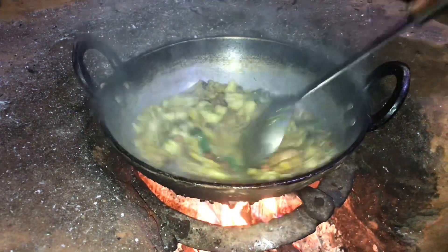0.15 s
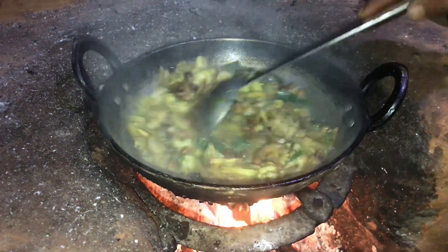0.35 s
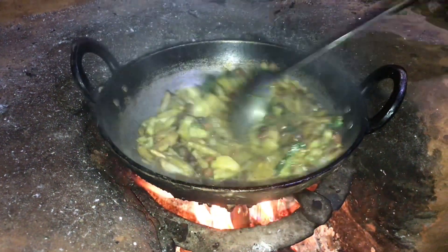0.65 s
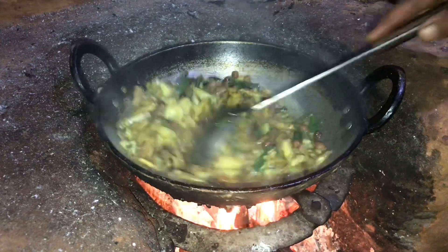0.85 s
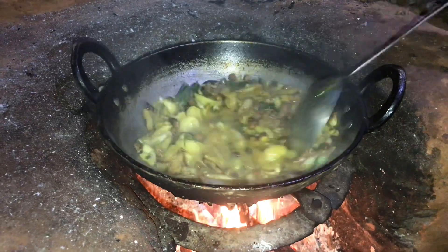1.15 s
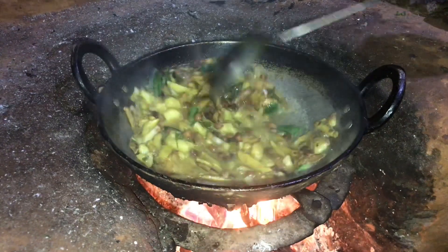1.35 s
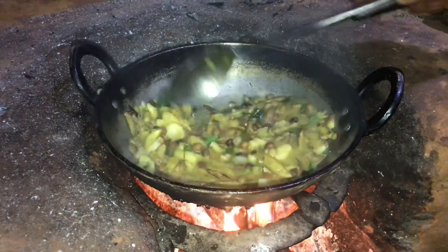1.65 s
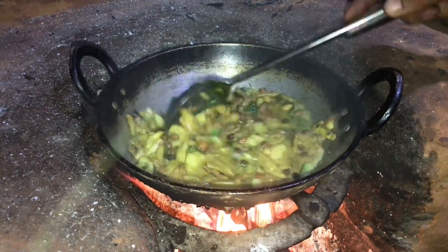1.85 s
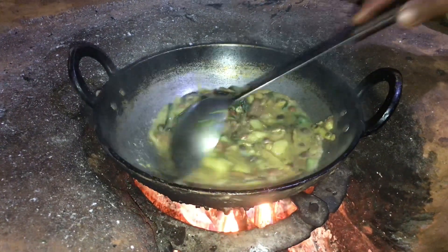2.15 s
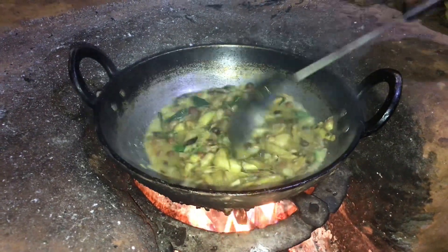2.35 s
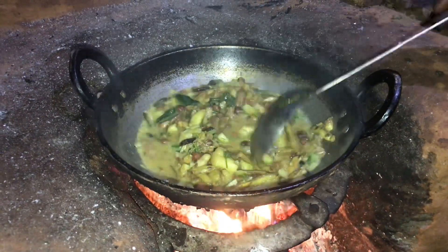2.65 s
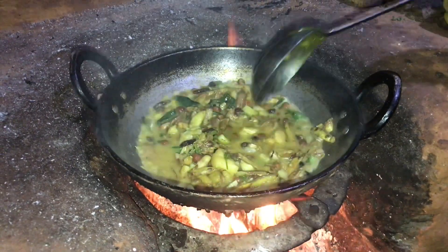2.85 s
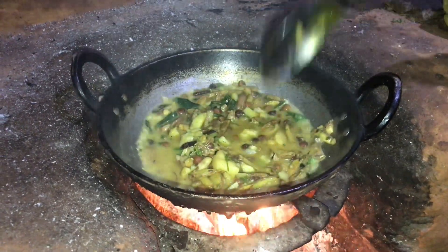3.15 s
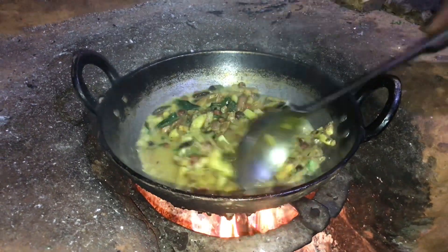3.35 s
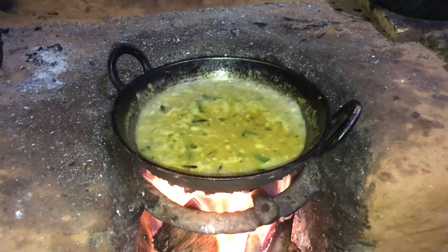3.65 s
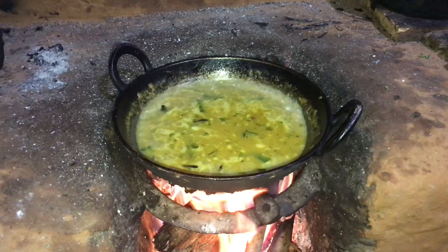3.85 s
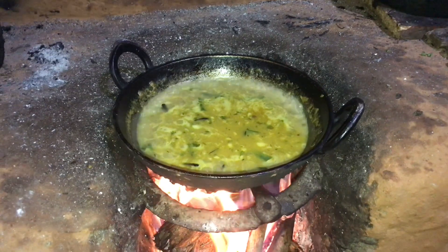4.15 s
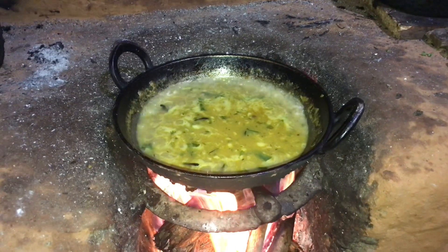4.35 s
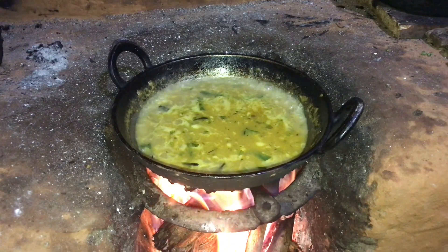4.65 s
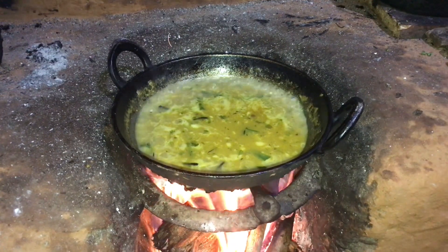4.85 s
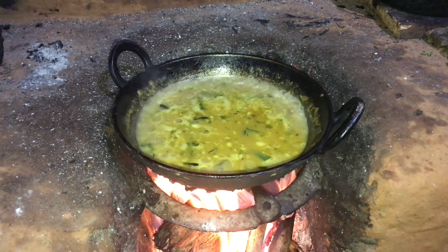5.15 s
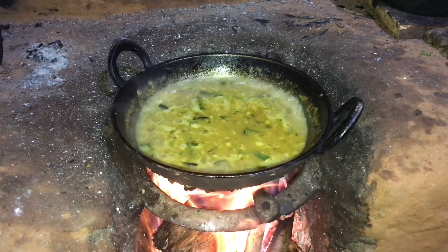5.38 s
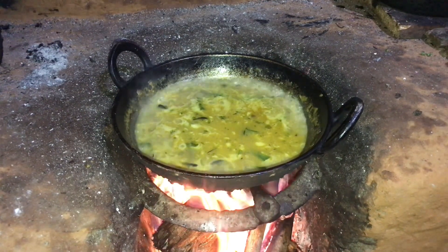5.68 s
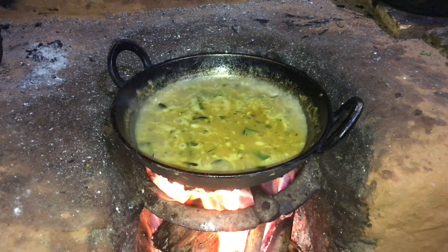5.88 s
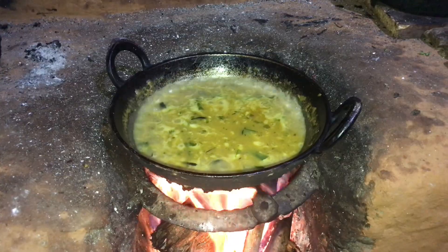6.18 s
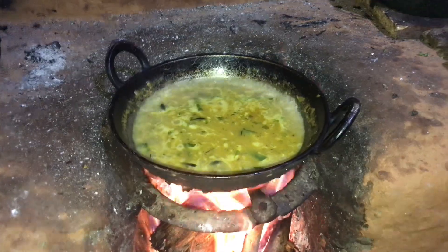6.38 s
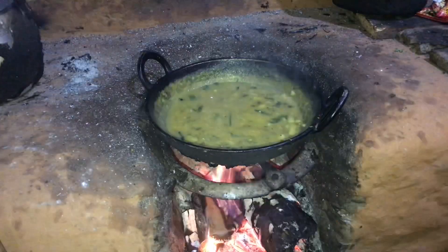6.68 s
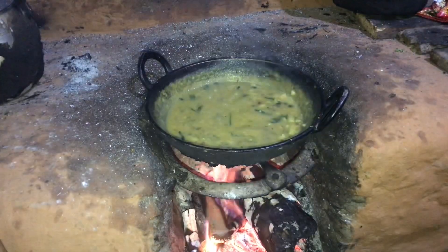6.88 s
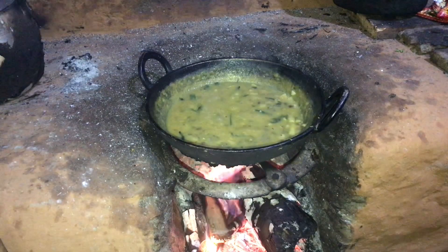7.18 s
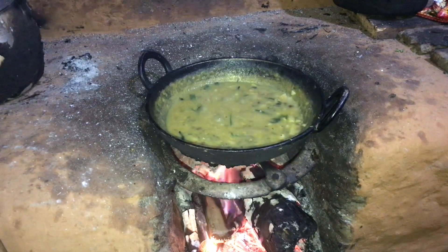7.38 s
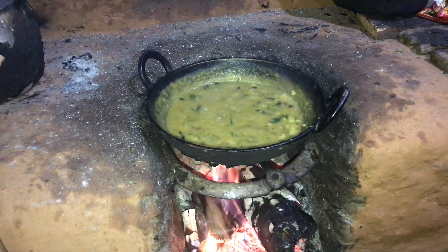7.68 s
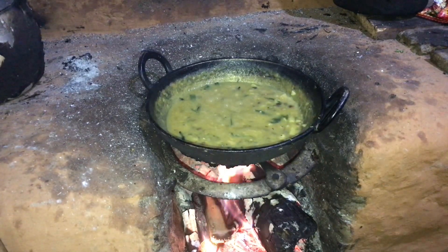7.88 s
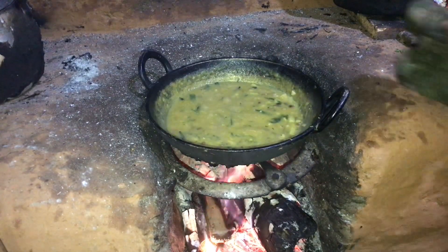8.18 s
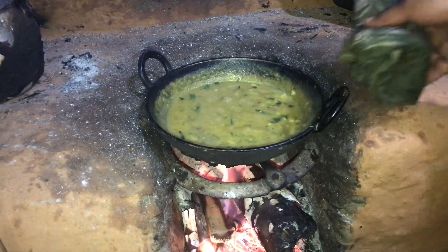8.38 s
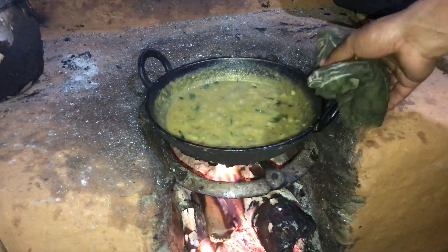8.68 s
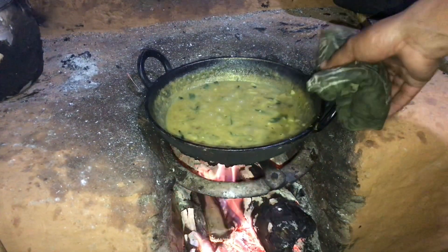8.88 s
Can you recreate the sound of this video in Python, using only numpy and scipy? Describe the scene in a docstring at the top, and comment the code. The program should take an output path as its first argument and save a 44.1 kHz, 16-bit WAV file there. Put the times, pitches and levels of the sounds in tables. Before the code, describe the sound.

Close up over an iron pan on a wood fire, wet vegetables fry with a loud, dense, bright sizzle while a metal ladle rubs the pan and steam squirts. After a tiny gap it drops to a much quieter gravy simmer with fine spatter, soft flame thumps and ticks. Another gap, then very faint bubbling, small plops, crackles of wood and light knocks. Small kitchen, dry, centred sound.

```python
"""Frying pan on a wood fire, heard close up

Vegetables fry loudly in an iron pan while a ladle stirs them; then gravy simmers at the hot rim, then
it has almost settled. The sound drops out briefly between these three stages. Swarms of ringing clicks
and noise make the bubbling; low noise makes the flames, and struck or swept resonances make the ladle,
steam, thick plops, spatter, thumps, ticks and knocks. Both channels carry the same signal.
"""
import sys
import numpy as np
from scipy import signal
from scipy.fft import rfft, irfft, next_fast_len
from scipy.io import wavfile
from scipy.ndimage import uniform_filter1d

SR = 44100
rng = np.random.default_rng(int(sys.argv[2]) if len(sys.argv) > 2 else 0)


def bounce(signal):
    """Save signal as a 16-bit WAV file at the path given by the first command-line argument."""
    frames = np.transpose(np.atleast_2d(signal))
    limited = np.clip(frames, -1, 1)
    pcm = np.round(limited * 32767).astype(np.int16)
    wavfile.write(sys.argv[1], SR, pcm)


N = 398223
TIME = np.arange(N) / SR
GRAVY_AT, SETTLED_AT = 3.52, 6.57  # starts of the simmering and the settling stage, s


def amp(db):
    """Amplitude factor of a level in dB."""
    return 10 ** (np.asarray(db) / 20)


def evened(x):
    """Scales x to an RMS of 1."""
    return x / np.sqrt(np.mean(x ** 2) + 1e-20)


def since(s):
    """Seconds gone by since s; zero before."""
    return np.maximum(TIME - s, 0)


def surge(t, rise_s):
    """Rises to 1 in rise_s, then dies away more slowly."""
    return t / rise_s * np.exp(1 - t / rise_s)


def add(mix, s, sound):
    """Lays a sound into the mix at s seconds, cut off at the end of the mix."""
    part = mix[round(s * SR):][:len(sound)]
    part += sound[:len(part)]


def shaped(x, gain):
    """Filters x by a gain that is a function of frequency."""
    size = next_fast_len(len(x) + 2048)
    return irfft(rfft(x, size) * gain(np.fft.rfftfreq(size, 1 / SR)), size)[:len(x)]


def coloured(x, tone):
    """Weights the spectrum of x by (Hz, dB) points, joined on a log frequency axis."""
    f, db = np.transpose(tone)
    return shaped(x, lambda hz: amp(np.interp(np.log(hz + 1), np.log(f), db)))


def ring(x, hz, width_hz):
    """One resonance of gain 1 at its centre."""
    return signal.lfilter(*signal.iirpeak(min(hz, .45 * SR), hz / min(width_hz, SR / 4), SR), x)


def flutter(size, rate_hz):
    """Slow random wavering of unit spread."""
    return evened(shaped(rng.standard_normal(size), lambda hz: 1 / (1 + (hz / rate_hz) ** 2)))


def bursts(size, per_s, spread_db, sharpness, count=20):
    """A swarm of bursting bubbles, evenly loud over all pitches: random clicks of random size ring briefly."""
    swarm = np.zeros(size)
    for hz in np.linspace(.02, .36, count) * SR:
        pops = rng.choice([-1., 1.], size) * amp(spread_db * np.minimum(rng.exponential(1, size), 3.2))
        pops *= rng.random(size) < per_s / count / SR
        swarm += evened(ring(pops, hz, 900 + hz / sharpness))
    return evened(swarm)


def patchy(x, depth_db):
    """Bubbles come in clumps of like size: patches about 1 kHz wide that last some 25 ms."""
    z = signal.stft(x, nperseg=256, noverlap=192)[2]
    patches = uniform_filter1d(rng.standard_normal(z.shape), size=6, axis=0)
    patches = uniform_filter1d(patches, size=17, axis=1)
    return signal.istft(z * amp(depth_db * evened(patches)), nperseg=256, noverlap=192)[1][:len(x)]


def sizzle(span, levels, tone, per_s, spread_db, juice_share, spray_share, flutter_db, clump_db):
    """Near bubbles stand out of the hiss of countless small ones; juice sounds low, spray high and in spurts."""
    part = slice(round(span[0] * SR), round(span[1] * SR))
    juice_db, spray_db = np.array(levels)[:, part]
    size = len(TIME[part])
    near = bursts(size, per_s, spread_db, sharpness=2.9)
    hiss = rng.standard_normal(size)

    def low(hz):
        return 1 / (1 + (hz / 4500) ** 6)

    def blend(near_share):  # share of the power
        return coloured(np.sqrt(near_share) * near + np.sqrt(1 - near_share) * hiss, tone)

    juice = evened(shaped(blend(juice_share), low))
    spray = evened(shaped(blend(spray_share), lambda hz: 1 - low(hz)))
    spurt_db = flutter_db * flutter(size, rate_hz=24)
    sound = juice * amp(juice_db + .5 * spurt_db) + spray * amp(spray_db + spurt_db)
    return patchy(sound, clump_db)


# Flares of the sizzle as wet food or gravy touches hot iron; a negative rise is a slight dip.
# Each row: start in seconds, rise of the spray in dB.
FLARE_ROWS = [(0.0, 1.5), (.12, 1.5), (.3, 3), (.37, -0.5), (.49, 1), (.61, 1.8), (.725, 3.5), (.95, 2),
              (1.12, 1.5), (1.32, 2.5), (1.72, 1.5), (2.44, -0.1), (2.74, 0.8), (5.11, 5.5), (5.4, 2),
              (5.78, 0.5)]
FLARE_RISE_S, FLARE_JUICE_SHARE = 0.022, 0.32  # the juice rises by this share of the spray's dB


def flares():
    """Rise of the sizzle (dB): every flare has the same quick swell and slower fall."""
    return sum(db * surge(since(s), FLARE_RISE_S) for s, db in FLARE_ROWS)


FRY_JUICE_DB, FRY_SPRAY_DB = -29.5, -23.5  # while the ladle stirs briskly
EASE_AT, EASE_S, EASE_DB = 1.44, 0.099, -1.48  # drop as the stirring eases off


def frying_levels():
    """Juice and spray (dB): wet food on the iron makes them flare, and both ease as the stirring slows."""
    ease = EASE_DB * .5 * (1 + np.tanh((TIME - EASE_AT) / EASE_S))
    flare = flares()
    return FRY_JUICE_DB + ease + FLARE_JUICE_SHARE * flare, FRY_SPRAY_DB + ease + flare


# levels as the simmering starts, and their growth as the gravy heats
SIMMER_JUICE_DB, SIMMER_SPRAY_DB, HEATING_DB_PER_S = -52.5, -55.5, 0.23


def simmer_levels():
    """Bubbling and spray (dB) grow slowly with the heat, and flare where gravy laps the rim."""
    heat = HEATING_DB_PER_S * since(GRAVY_AT)
    flare = flares()
    return SIMMER_JUICE_DB + heat + FLARE_JUICE_SHARE * flare, SIMMER_SPRAY_DB + heat + flare


REST_JUICE_DB, REST_SPRAY_DB = -68, -69.5
CALMING_DB, CALMING_S = 3, 0.16  # extra level that dies away at the start
SWELL_AT, SWELL_S, SWELL_DB = 8.2, 0.26, 6  # gravy wets the rim


def settling_levels(juice_share=0.56):
    """Bubbling and spray (dB) calm down, then swell once at the rim."""
    calming = CALMING_DB * np.exp(-since(SETTLED_AT) / CALMING_S)
    swell = SWELL_DB * np.exp(-((TIME - SWELL_AT) / SWELL_S) ** 2)
    return REST_JUICE_DB + calming + juice_share * swell, REST_SPRAY_DB + calming + swell


# Spectral weighting of the bubbles in the three stages, heard right over the pan.
# Each row: frequency in Hz, relative weight in dB.
FRYING_SPECTRUM = [(110, -49), (180, -24), (347, -21.5), (451, -22), (608, -12.5), (989, -10.5),
                   (1150, -3.5), (1330, -9), (1470, -7), (3100, -1.5), (4860, 0), (9350, 2), (10500, 1),
                   (12400, 1.5), (15800, -1)]
SIMMER_SPECTRUM = [(110, -33), (180, -23), (225, -4), (272, -14.5), (388, -9), (495, -14), (680, -9),
                   (901, -8.5), (1070, -1), (1240, -7.5), (1520, -3), (3100, 0.5), (7760, -11),
                   (12900, -13), (15800, -16)]
SETTLING_SPECTRUM = [(88, -41), (150, -5.5), (244, -5.5), (361, -6.5), (382, -3), (598, -6), (634, -9),
                     (741, -6.5), (1330, -11), (2340, -12), (4910, -6.5), (8640, -3.5), (15800, -10.5)]


def pan():
    """The bubbles grow fewer from stage to stage, so that single ones stand out more."""
    frying = sizzle((0, GRAVY_AT), frying_levels(), FRYING_SPECTRUM, per_s=16000, spread_db=1.0,
                    juice_share=0.27, spray_share=0.27, flutter_db=0.43, clump_db=0.8)
    simmer = sizzle((GRAVY_AT, SETTLED_AT), simmer_levels(), SIMMER_SPECTRUM, per_s=2200, spread_db=4.0,
                    juice_share=0.15, spray_share=0.17, flutter_db=1.2, clump_db=1.0)
    settling = sizzle((SETTLED_AT, N / SR), settling_levels(), SETTLING_SPECTRUM, per_s=260, spread_db=-4.5,
                      juice_share=0.078, spray_share=0.15, flutter_db=-0.5, clump_db=2.5)
    return np.concatenate([frying, simmer, settling])


# Spectral weighting of the fire under the pan. Each row: frequency in Hz, relative weight in dB.
FLAME_SPECTRUM = [(11, -41), (18, -6), (48, -7.5), (86, 2), (123, -3), (183, -17.5), (221, -13.5),
                  (273, -17.5), (300, -10.5), (390, -38), (660, -120)]
FIRE_FRY_DB, FIRE_SIMMER_DB, FIRE_SETTLED_DB = -57, -60, -68  # level of the flames as each stage starts, dB
FIRE_SAG_DB_PER_S = -1.03


def flames(flutter_db=2.0):
    """A low roar in the mouth of the stove: fluttering noise that sinks through each stage."""
    roar = evened(coloured(rng.standard_normal(N), FLAME_SPECTRUM))
    roar = evened(roar * amp(flutter_db * flutter(N, rate_hz=22)))
    stages = [TIME < GRAVY_AT, TIME < SETTLED_AT]
    level_db = np.select(stages, [FIRE_FRY_DB, FIRE_SIMMER_DB], FIRE_SETTLED_DB)
    age = np.select(stages, [TIME, since(GRAVY_AT)], since(SETTLED_AT))
    return roar * amp(level_db + FIRE_SAG_DB_PER_S * age)


# Ladle strokes on the iron. Each row: start in seconds, level in dB before the fades, length in seconds.
STROKE_ROWS = [(.05, -41, 0.098), (0.149, -39.5, .12), (0.269, -43, 0.092), (.499, -38, 0.23),
               (.88, -43.5, 0.18), (1.5, -42, .076), (1.696, -43, .12)]
# Modes of the loaded pan. Each row: frequency in Hz, width in Hz, relative level in dB.
PAN_MODES = [(360, 83, -32), (620, 300, 18), (755, 65, -3), (1270, 96, 25.5), (1590, 39, 14),
             (2130, 160, 9)]


def ladle():
    """The ladle rubs over the iron and sets the damped pan humming: noise through the pan's modes."""
    out = np.zeros(N)
    for s, db, length in STROKE_ROWS:
        rub = rng.standard_normal(SR // 2)[:int(length * SR)]
        hum = sum(amp(mode_db) * ring(rub, hz, width) for hz, width, mode_db in PAN_MODES)
        add(out, s, amp(db) * evened(hum) * signal.windows.hann(len(rub)))
    return out


def puffs(rows, width_share, rise):
    """Brief whistles through a small opening, whose pitch wavers and rises as it closes."""
    out = np.zeros(N)
    for s, db, hz, length in rows:
        u = np.linspace(0, 1, int(length * SR))
        wander = flutter(SR // 4, width_share * hz)[:len(u)]
        turns = np.cumsum(hz * (1 + rise * (u - .5) + width_share * wander)) / SR
        breath = 1 + .5 * flutter(SR // 4, width_share * hz)[:len(u)]
        puff = np.sin(2 * np.pi * turns) * breath * np.sin(np.pi * u ** 1.07)
        add(out, s, amp(db) * puff / abs(puff).max())
    return out


# Steam squirting from under the food.
# Each row: start in seconds, peak in dB, pitch in Hz, length in seconds.
SQUIRT_ROWS = [(.31, -20, 10800, 0.11), (.36, -17, 8260, 0.079), (.74, -19, 10740, 0.087),
               (.745, -15, 8300, 0.028), (2.43, -26, 2910, 0.23), (2.45, -24, 4300, 0.19),
               (3.567, -47, 6800, .011), (5.435, -46, 8500, 0.022), (5.8, -44, 9400, .058),
               (5.91, -48, 9200, .025), (6.515, -40, 6700, 0.011)]


def squirts():
    """Steam whistles out from under the food, each squirt a wavering high tone."""
    return puffs(SQUIRT_ROWS, width_share=0.099, rise=0.0187)


def spatter(span, per_s, least_db, spread_db, count=8):
    """Droplets spit on the hot rim: dry clicks, most of them small and each of its own brightness."""
    out, t = np.zeros(N), np.arange(512) / SR
    within = (TIME > span[0]) & (TIME < span[1])
    for hz in np.geomspace(5500, 13000, count):
        click = rng.choice([-1., 1.], len(t)) * np.exp(-t / 0.0011)
        click = ring(ring(click, hz, 1.2 * hz), hz, 1.2 * hz)
        size = amp(least_db + spread_db * np.minimum(rng.exponential(1, N), 2.5))
        hits = size * within * (rng.random(N) < per_s / count / SR)
        out += signal.oaconvolve(hits, click / abs(click).max())[:N]
    return out


# Soft thumps as the flames puff in the stove. Each row: start in seconds, peak in dB, pitch in Hz.
THUMP_ROWS = [(3.716, -47, 88), (4.492, -50, 104), (4.653, -47, 99), (4.927, -47, 81), (5.856, -53, 81),
              (5.959, -52, 100), (6.07, -54, 78), (6.294, -54, 78), (6.46, -49, 90), (7.035, -52, 84),
              (7.42, -49.5, 114)]


def thumps(rise_s=0.009):
    """Each puff of flame rings the hollow of the stove for a few cycles."""
    out, t = np.zeros(N), np.arange(8192) / SR
    for s, db, hz in THUMP_ROWS:
        add(out, s, amp(db) * surge(t, rise_s) * np.sin(2 * np.pi * hz * t))
    return out


# Sharp ticks of the burning wood. Each row: start in seconds, peak in dB, centre frequency in Hz.
TICK_ROWS = [(3.981, -38, 6000), (4.502, -34, 7000), (5.142, -39, 9000), (5.981, -33.5, 6500),
             (6.372, -32, 8000), (6.688, -44, 6500), (6.747, -46, 6000), (7.033, -44, 4500),
             (7.156, -45, 7000), (7.2355, -49, 8600), (7.3, -46, 12400), (7.386, -43.5, 6300),
             (7.472, -46, 10500), (7.523, -49, 11000), (7.886, -48, 5500), (7.9027, -43, 8900),
             (8.166, -43, 11400), (8.374, -44, 14000), (8.418, -41, 12700), (8.641, -35.5, 8050),
             (8.752, -40, 11000), (8.758, -44, 12500), (8.785, -46, 12000), (8.881, -44, 11500),
             (8.896, -43, 12500), (8.943, -43, 6900)]


def ticks(snap_t60=0.0069, tail_db=-25, tail_t60=0.054, width_hz=8900):
    """Each tick is a snap of a few milliseconds, with a faint spatter of splinters trailing it."""
    out, t = np.zeros(N), np.arange(4096) / SR
    for s, db, hz in TICK_ROWS:
        decay = amp(-60 * t / snap_t60) + amp(tail_db - 60 * t / tail_t60)
        snap = rng.choice([-1., 1.], len(t)) * decay
        snap = ring(ring(snap, hz, width_hz), hz, width_hz)
        add(out, s, amp(db) * snap / abs(snap).max())
    return out


# Knocks of shifting firewood. Each row: start in seconds, level of the ring in dB, pitch in Hz,
# time to fall 60 dB in seconds, crack against the ring in dB (before crack_db is added).
KNOCK_ROWS = [(4.505, -48, 192, 0.059, -12), (4.667, -53, 215, .06, -18), (6.371, -44, 380, 0.017, 12),
              (6.606, -50, 615, 0.01, 3), (6.628, -47.5, 600, 0.033, -8), (6.883, -50.5, 360, 0.054, -6),
              (8.87, -49.5, 680, 0.02, -4), (8.878, -54, 200, .05, -12), (8.912, -55, 557, .032, -10)]


def knocks(thud_db=-3, crack_db=1, crack_t60=0.015):
    """A short crack together with the dull ring of a stick and the thud of the ash under it."""
    out, t = np.zeros(N), np.arange(8192) / SR
    for s, db, hz, t60, bright_db in KNOCK_ROWS:
        blow, split = rng.choice([-1., 1.], (2, len(t)))
        decay = amp(-60 * t / t60)
        stick = np.sin(2 * np.pi * hz * t) * decay
        thud = ring(ring(blow * np.sqrt(decay), 370, 640), 370, 640)
        thud *= amp(thud_db) / abs(thud).max()
        crack = ring(split * amp(-60 * t / crack_t60), hz=1700, width_hz=2600)
        crack *= amp(bright_db + crack_db) / abs(crack).max()
        add(out, s, amp(db) * (stick + thud + crack))
    return out


# level at first, level at rest, time constant of calming down
GURGLE_START_DB, GURGLE_REST_DB, GURGLE_CALM_S = -62.5, -79, 0.63


def gurgle(per_s=480, spread_db=2.5, low_hz=520, high_hz=2300, cycles=5, count=24):
    """Small thick bubbles in the settling gravy each ring for a few cycles, rising a little in pitch."""
    out, t = np.zeros(N), np.arange(2048) / SR
    for hz in np.geomspace(low_hz, high_hz, count):
        age = hz * t / cycles
        blip = age * np.exp(-3 * age) * np.sin(2 * np.pi * hz * t * (1 + 0.026 * age))
        starts = rng.random(N) < per_s / count / SR
        size = amp(spread_db * np.minimum(rng.exponential(1, N), 3))
        out += signal.oaconvolve(starts * size, evened(blip))[:N]
    calming = np.exp(-since(SETTLED_AT) / GURGLE_CALM_S)
    level_db = GURGLE_REST_DB + (GURGLE_START_DB - GURGLE_REST_DB) * calming
    return evened(out) * amp(level_db) * (TIME > SETTLED_AT)


# Thick bubbles opening in the gravy. Each row: start in seconds, peak in dB, pitch in Hz.
PLOP_ROWS = [(6.672, -57, 1330), (6.75, -57, 1090), (6.878, -53, 1700), (7.178, -61, 2040),
             (7.765, -60, 754), (8.276, -55, 1364), (8.366, -62, 1870), (8.565, -61, 613),
             (8.699, -58, 1710), (8.841, -57, 1270)]


def plops(length_s=0.033):
    """Steam opens a thick bubble with a short wavering tone."""
    return puffs([(*row, length_s) for row in PLOP_ROWS], width_share=0.085, rise=.01)


def echoes(x, decay_s, count):
    """Sparse reflections of random sign that die away, together of unit energy."""
    at, taps = rng.integers(25, 26 + int(4 * decay_s * SR), count), np.zeros(SR)
    taps[at] = rng.choice([-1., 1.], count) * np.exp(-at / SR / decay_s)
    return signal.oaconvolve(x, taps / np.linalg.norm(taps))[:N]


# Peaks and hollows that the bowl and the hearth give every sound.
# Each row: centre in Hz, half width in Hz, height in dB.
HEARTH_PEAKS = [(172, 37, -1.5), (275, 9.1, -1.5), (343.6, 49, 3.5), (456, 31, -4.5), (669, 54, 4),
                (1015, 13, -1), (1270, 79, 1), (1490, 120, 0.5), (1500, 92, 3), (2390, 17, 3.5),
                (4380, 110, 1.5), (4860, 350, -2.5), (5130, 57, 1), (7760, 490, -2.5), (9000, 650, -0.5),
                (10430, 400, -4), (12400, 700, 0)]


def hearth(x):
    """The bowl and the hearth colour the sound with bell-shaped peaks and hollows that add up in dB."""
    def gain(hz):
        return amp(sum(db * np.exp(-((hz - f) / width) ** 2) for f, width, db in HEARTH_PEAKS))
    return shaped(x, gain)


def scene():
    """All sources lie close together; the pan wall answers at once, the kitchen a little later."""
    lively = spatter((GRAVY_AT, SETTLED_AT), per_s=38, least_db=-51.0, spread_db=1)
    lazy = spatter((SETTLED_AT, N / SR), per_s=42, least_db=-55, spread_db=2.0)
    sound = pan() + flames() + ladle() + squirts() + lively + lazy
    sound += thumps() + ticks() + knocks() + gurgle() + plops()
    sound = sound + amp(-24) * echoes(sound, decay_s=0.0037, count=30) \
        + amp(-13.0) * echoes(sound, decay_s=.035, count=400)
    sound = hearth(sound)
    return np.array([sound, sound])


# Brief dropouts between the stages.
# Each row: start of the dropout in seconds, start of the return in seconds, fade-in in seconds.
DROPOUTS = [(3.5, 3.539, .005), (6.545, 6.585, .018)]
LEAK_DB, LEAK_FADE_S = -21, 0.0044  # remnant that fades as the sound drops out
EDGE_HZ = 15800  # top of the band


def record(dry):
    """The level drops out briefly between the stages; a low-pass then limits the band."""
    gain = np.ones(N)
    for cut, back, fade_s in DROPOUTS:
        leak = amp(LEAK_DB) * np.exp(-since(cut) / LEAK_FADE_S) + amp(-59)
        gain *= np.where(TIME < cut, 1, np.minimum(leak + since(back) / fade_s, 1))
    edge = signal.firwin(801, EDGE_HZ, window=("kaiser", 9), fs=SR)
    return signal.oaconvolve(dry * gain, edge[None], "same")


dry = scene()
out = record(dry)
bounce(out)
```